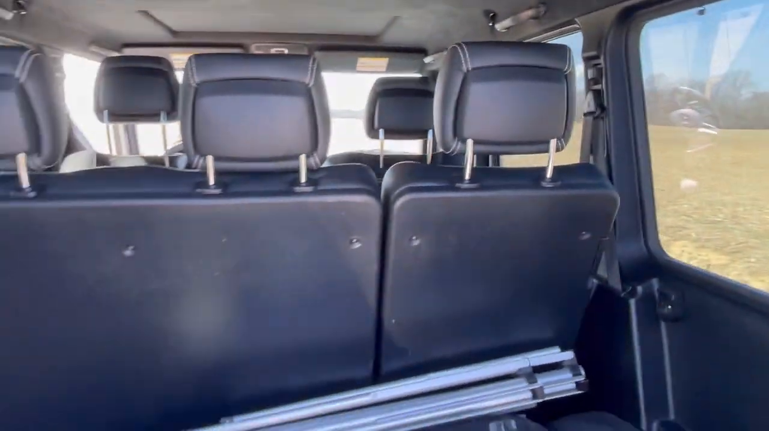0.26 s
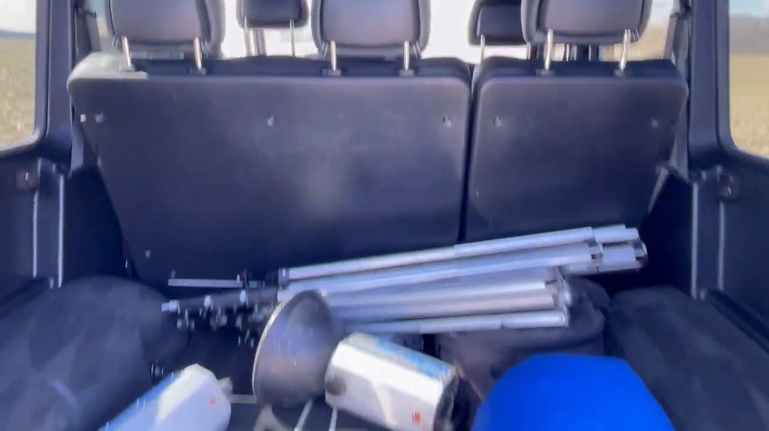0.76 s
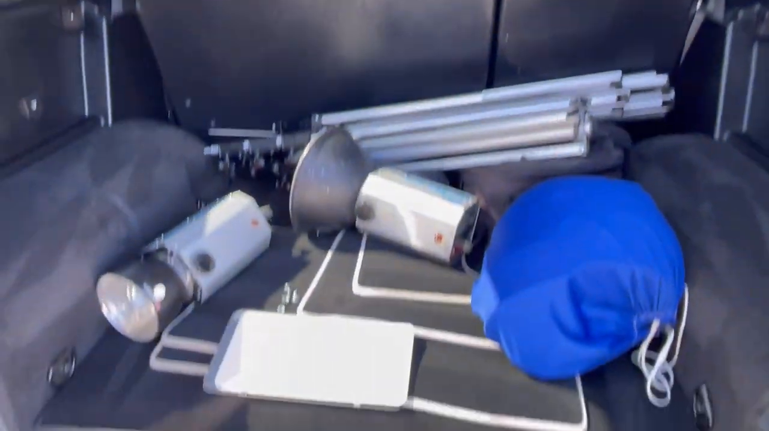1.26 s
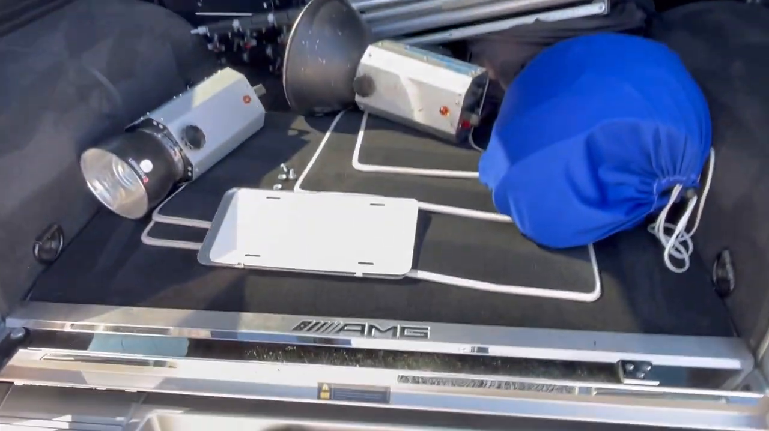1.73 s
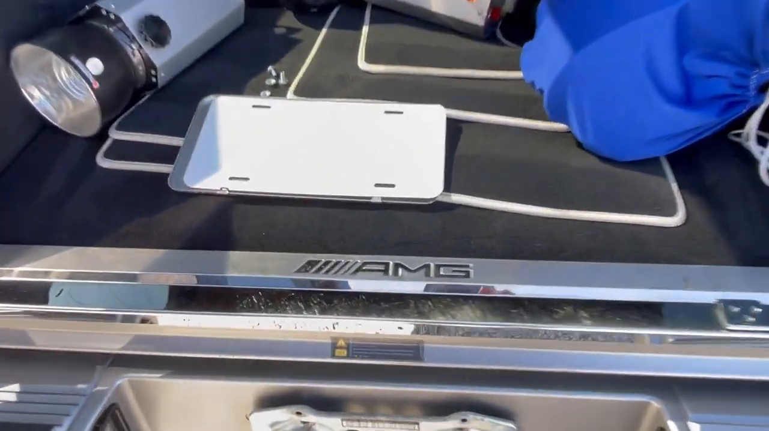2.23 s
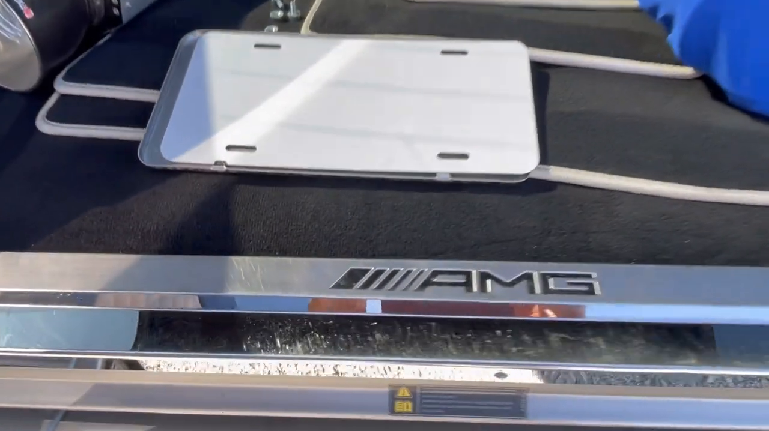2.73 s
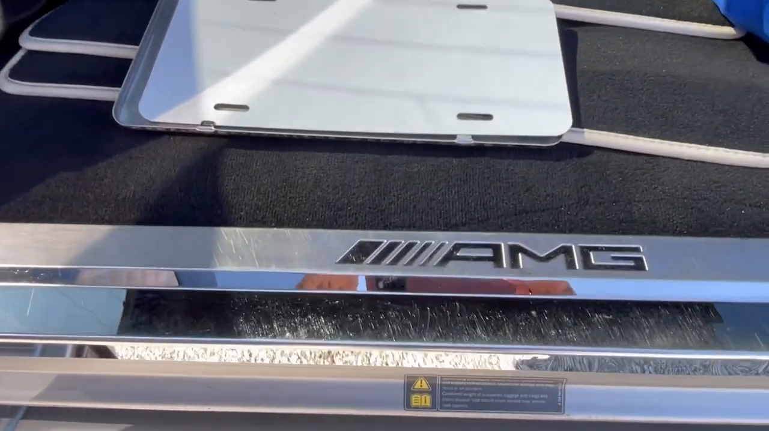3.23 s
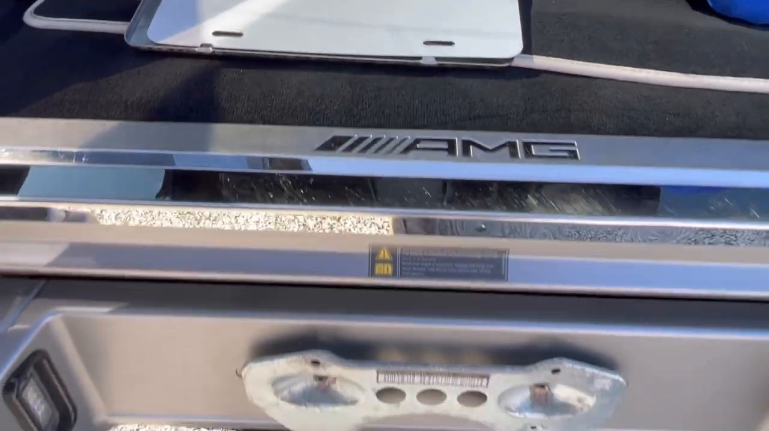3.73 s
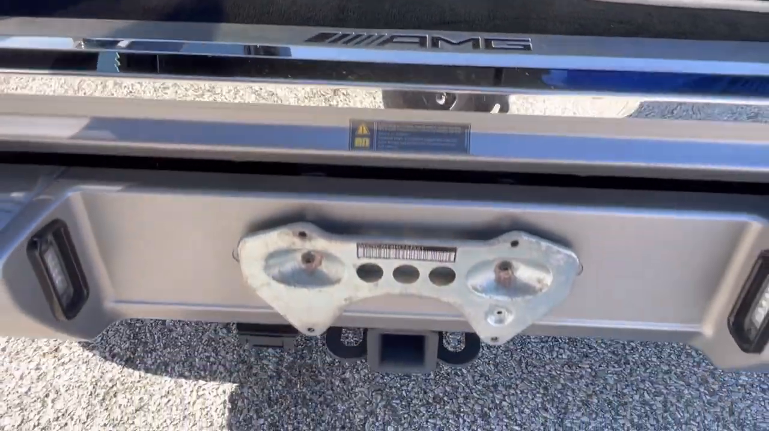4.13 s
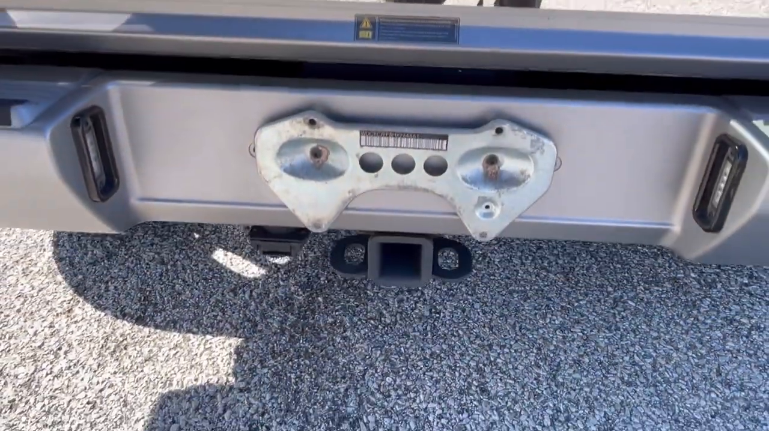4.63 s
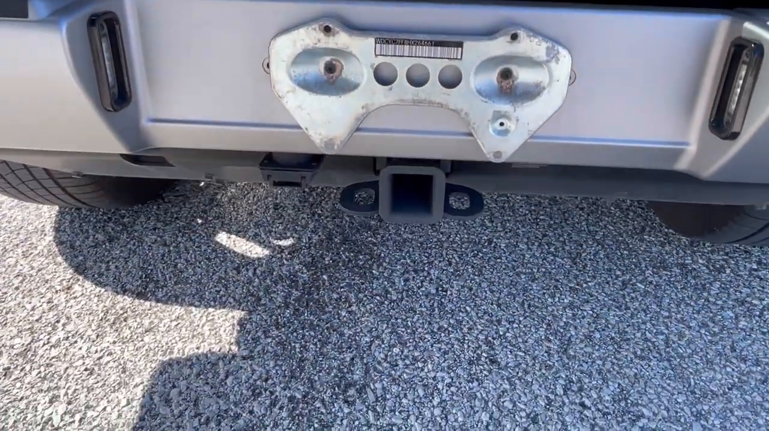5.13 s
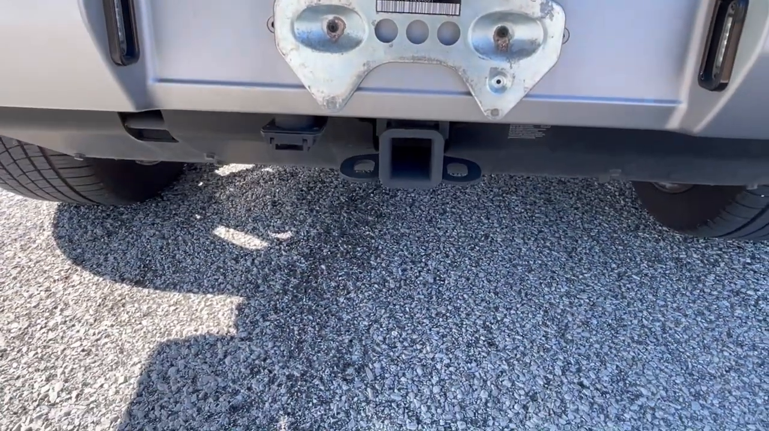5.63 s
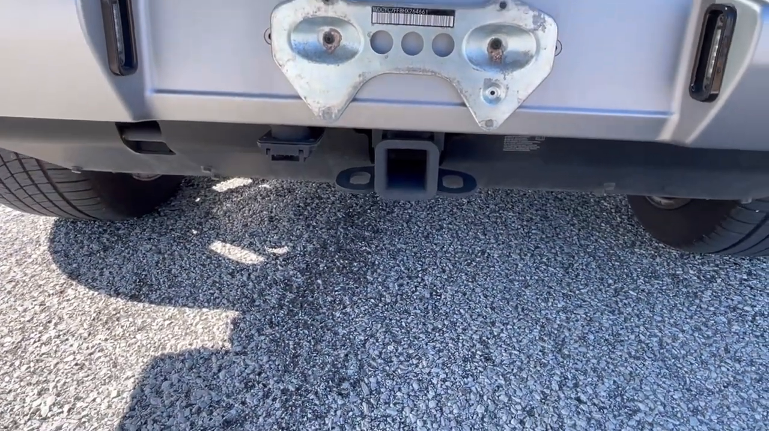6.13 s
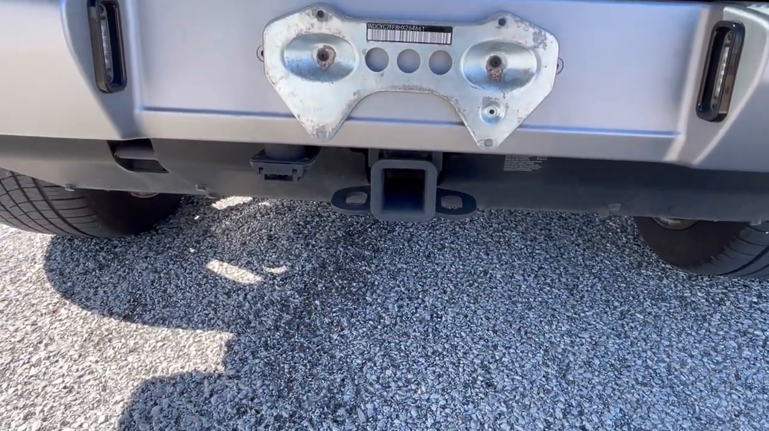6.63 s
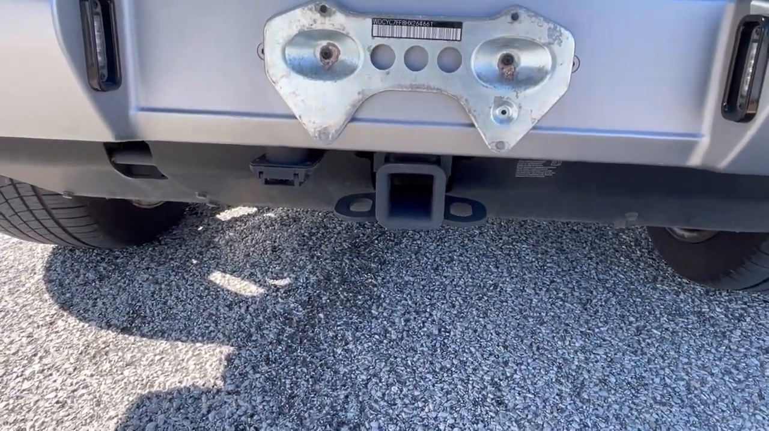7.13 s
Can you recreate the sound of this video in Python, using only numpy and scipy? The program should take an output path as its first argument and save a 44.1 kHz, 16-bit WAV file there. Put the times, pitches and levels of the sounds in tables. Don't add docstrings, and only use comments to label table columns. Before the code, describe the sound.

A big petrol engine idles with a deep uneven throb, moving from boxy to close and rattly, as shoes scuff and stones crack on gravel.

```python
import sys
import numpy as np
from scipy import signal
from scipy.fft import rfft, irfft, next_fast_len
from scipy.io import wavfile
from scipy.ndimage import map_coordinates

SR = 44100
rng = np.random.default_rng(int(sys.argv[2]) if len(sys.argv) > 2 else 0)


def to_wav(sig):
    pcm = np.clip(np.atleast_2d(sig), -1, 1) * 32767
    pcm = np.round(pcm).astype(np.int16)
    wavfile.write(sys.argv[1], SR, pcm.T)


def gain_from_db(level_db):
    decades = np.asarray(level_db, float) / 20
    return 10 ** decades


N = 325017
TIME = np.arange(N) / SR

# time_s, nearness_db, view_under_car_0_to_1
PHONE_PATH = [(.1, -5.5, 0.2), (.35, -4, 0.4), (.7, -1.5, .15), (1.2, -0.2, .3), (1.7, -0.06, 0.42),
              (2.7, -0.33, 0.28), (3.4, 0.4, .37), (4.2, 3, 0.3), (4.8, 4.5, .5), (5.3, 6.5, 0.72),
              (5.7, 7, 0.71), (6.5, 6.5, 0.6), (7.3, 8, .68)]
# time_s, speed_rpm
CRANK_SPEED = [(0.0, 673.4), (1.2, 671.2), (1.6, 670.0), (2.0, 668.0), (2.4, 667.5), (3.2, 671.0),
               (3.6, 671.2), (4.0, 670.5), (4.4, 670.7), (4.8, 672.6), (5.2, 672.2), (5.6, 668.9),
               (6.0, 667.0), (6.4, 667.7), (6.8, 671.1), (7.2, 677.1)]
# charge_db, bark_db
CYLINDERS = [(-1, 2.5), (1.7, 1.5), (5.5, 2), (8, -1), (4, -0.5), (8.5, 3), (2.5, -12), (5.7, 2),
             (6.5, -7.5), (2.5, -6), (7.5, 1), (3.5, -3.5)]
# time_s, level_db
STUMBLES = [(.02, -2), (.71, -8.5), (.9, -6), (1.61, -6), (2.681, -5), (2.88, -3.5), (3.579, -8),
            (4.12, -1.5), (4.3, -2), (5.55, -3), (5.911, -7), (6.9, -5), (7.05, -4), (7.28, -3.5)]
# place_firing_steps, level_db
VALVE_CLOSINGS = [(.3, -4.5), (.9, 3), (1.7, -4.5), (2.25, -13.5), (2.9, 4.5), (3.4, -12), (4, -12),
                  (4.4, -11.5), (5, -14), (5.3, -8.5), (6.05, -4), (7, -5.5), (7.3, -8), (8.6, 0), (9.4, 9),
                  (9.9, -4), (10.2, 2), (10.85, -2)]
# time_s, pitch_hz
FAN_RATE = [(0, 71.5), (3, 71.5), (3.5, 71.26), (5.6, 71.26), (6, 71.5), (7.37, 71.4)]
# frequency_hz, density_db_per_hz
BARK_IN_BAY = [(88, -22.5), (150, 0.5), (156, -3.5), (236, -10), (270, -21), (317, -14.5), (423, -28),
               (639, -33.5), (756, -30), (800, -24), (1040, -54), (1760, -120)]
# frequency_hz, density_db_per_hz
BARK_BELOW = [(88, -3.5), (150, -4), (162, -6), (247, -10), (345, -33.5), (383, -20.5), (460, -17),
              (605, -28.5), (772, -40), (800, -23), (1040, -61), (1760, -120)]
# frequency_hz, density_db_per_hz
RUMBLE_COLOUR = [(18, -30.5), (30, -10.5), (50, 5.5), (60, 3), (85, 9), (110, 11), (160, -11), (250, -17.5),
                 (500, -110)]
# frequency_hz, density_db_per_hz
CLATTER_IN_BAY = [(350, -6.5), (600, -5.5), (642, -2.5), (757, -10), (822, -5), (969, 2), (1040, -1.5),
                  (1190, 1.5), (1390, -1.5), (1590, -7.5), (1980, -9), (2110, -6), (2210, -29),
                  (3600, -26.5), (4680, -57.5), (7920, -120)]
# frequency_hz, density_db_per_hz
CLATTER_BELOW = [(350, -22), (600, -4), (729, -10), (774, -24.5), (822, -9.5), (1100, -9.5), (1390, -1.5),
                 (1630, -2.5), (1770, -7.5), (1930, -6.5), (2100, -16), (2210, -15.5), (2610, -27.5),
                 (3600, -27.5), (4680, -61), (7920, -120)]
# frequency_hz, density_db_per_hz
HISS_COLOUR = [(900, -110), (2000, 2), (2700, 1.5), (3600, -4), (5100, -4.5), (5900, -3.5), (7200, -11),
               (7900, -7.5), (8400, -8.5), (9300, -5.5), (10300, -12), (10900, -12.5), (11100, -44.5),
               (12200, -48.5)]
# frequency_hz, density_db_per_hz
GRIT_COLOUR = [(700, -110), (1500, -10), (3000, -2), (3800, -5), (4500, -3), (5200, -4.5), (6000, -6),
               (7000, -9), (8500, -6.5), (9600, -13.5), (10400, -9), (11200, -13.5), (11650, -22),
               (12000, -94.5)]
# pitch_hz, width_hz, level_db
TAIL_PIPE = [(185, 20, -6), (241, 20, 4), (517, 28, 2)]
# pitch_hz, width_hz, level_db
BAY_AIR = [(321, 24, 6)]
# pitch_hz, width_hz, level_db
PANELS = [(845, 22, 0), (1000, 30, -3), (1164, 20, 1), (1228, 30, -2), (1276, 16, 1), (1360, 12, 3),
          (1422, 30, -1), (1734, 20, 1), (2052, 16, 2), (2563, 30, -2)]
# pitch_hz, width_hz, level_db
BAY_TRIM = [(1912, 12, 9)]
# pitch_hz, width_hz, level_db
FLOOR_COVER = [(1360, 13, 9), (1428, 30, 1), (1290, 30, 1)]
# centre_s, length_s, level_db, left_over_right_db
SCUFFS = [(0.687, 0.093, -62, 1), (1.093, 0.12, -54, -3.5), (1.237, 0.056, -60.5, 0), (3.6, .2, -63, -2),
          (4.315, 0.028, -53, -2), (4.488, 0.039, -52.5, -2), (5.182, 0.018, -54, 1),
          (6.724, 0.079, -48.5, -3), (6.822, 0.13, -46.5, -3), (7.017, 0.12, -49, -3),
          (7.085, 0.04, -51, 0), (7.128, 0.046, -57, 0), (7.268, .07, -68, 0)]
# start_s, peak_db, pitch_hz
STONE_CRACKS = [(.46, -57, 6700), (2.985, -52, 2200), (3.192, -51, 2190), (4.243, -51.5, 2220),
                (4.267, -40, 2280), (4.268, -34.5, 1230), (4.27, -35, 740), (4.285, -49, 1610),
                (4.294, -50, 2200), (4.3, -44.5, 1100), (4.312, -32.5, 706), (4.481, -44.5, 6700),
                (4.484, -44, 4370), (4.497, -45, 6200), (5.85, -33.5, 1600), (5.85, -39, 2470),
                (5.8496, -34, 3140), (5.851, -38, 4540), (5.953, -41.5, 1700), (5.953, -48, 4600),
                (6.417, -35.5, 2350), (6.419, -45.5, 4600), (7.296, -41, 2480)]
# start_s, peak_db, pitch_hz
HEEL_THUDS = [
    (4.329, -16, 241),
    (4.33, -33, 432),
    (4.354, -29, 315),
    (4.433, -33, 223),
]
# frequency_hz, likeness_0_to_1
PORT_LIKENESS = [(60, .98), (150, .6), (300, .75), (600, .72), (1000, .66), (2000, .5), (3400, .3),
                 (5200, .33), (6000, .62), (7000, .4), (8000, .72), (9000, .92), (10300, .97), (11500, .85)]
# frequency_hz, left_over_right_db
PORT_SHADING = [(60, 0.59), (140, 5), (260, 1.5), (500, 4.5), (1000, 2.1), (2000, -1.5), (4000, 1),
                (11400, 1)]
# frequency_hz, left_leads_by_rad
PORT_LEAD = [(0, 0), (600, .05), (1000, -.5), (1500, -.5), (2070, .6), (2580, .5), (3300, 2.9), (4300, .2),
             (5200, 3.1), (5900, 5.9), (7060, 9.2), (8000, 7.1), (9000, 5.5), (9500, 4.4), (10200, 3.14),
             (10900, 2.4), (11600, 0)]


def unit(x):
    return x / np.sqrt(np.mean(x ** 2) + 1e-20)


def along(points, hz):
    f, v = np.transpose(points)
    return np.interp(np.log(hz + 1), np.log(f + 1), v)


def curves(rows):
    s, *cols = np.transpose(rows)
    return [np.interp(TIME, s, c) for c in cols]


def wobble(rate):
    knots = rng.standard_normal(int(N * rate / SR) + 4)
    return map_coordinates(knots, [TIME * rate])


def filtered(x, response):
    m = next_fast_len(N + SR // 2)
    spectrum = rfft(x, m) * response(np.fft.rfftfreq(m, 1 / SR))
    return irfft(spectrum, m)[..., :x.shape[-1]]


def coloured(x, colour):
    return filtered(x, lambda f: gain_from_db(along(colour, f)))


def mode(f, hz, width):
    return 1j * f * width / (hz * hz - f * f + 1j * f * width)


def resonant(x, modes, colour):
    def response(f):
        rings = 1 + sum(gain_from_db(db) * mode(f, hz, width) for hz, width, db in modes)
        return rings * gain_from_db(along(colour, f))
    return filtered(x, response)


def spread(mid, other):
    def response(f):
        turn = np.arccos(np.clip(along(PORT_LIKENESS, f), 0, 1)) / 2
        return np.array([np.cos(turn), np.sin(turn)])
    a, b = filtered(np.array([mid, other]), response)
    return np.array([a + b, a - b])


def level(far_db, growth):
    return far_db + growth * curves(PHONE_PATH)[0]


def bay_to_below(bay, below):
    view = np.clip(curves(PHONE_PATH)[1], 0, 1)
    return (1 - view) * bay + view * below


def sheltered():
    out_s = 0.86
    return np.clip(1 - TIME / out_s, 0, 1)


def firing():
    return np.cumsum(curves(CRANK_SPEED)[0] / 10) / SR


def firing_steps():
    return np.arange(int(firing()[-1]))


def blows(steps, sizes):
    at = np.searchsorted(firing(), steps)
    return np.bincount(np.clip(at, 0, N), sizes, N + 1)[:N]


def valve_rattle():
    place, db = np.transpose(VALVE_CLOSINGS)
    count = len(CYLINDERS)
    cycle = count * np.arange(int(firing()[-1]) // count + 1)[:, None]
    luck = rng.standard_normal((len(cycle), len(place), 2))
    steps = cycle + place + 0.079 * luck[..., 0]
    sizes = gain_from_db(db + 1.9 * luck[..., 1])
    ticks = blows(steps.ravel(), sizes.ravel())
    return signal.fftconvolve(ticks, np.hanning(240))[120:][:N]


def air_hiss(rattle):
    hiss_db = level(-62, growth=1.18) - 2.5 * sheltered()
    air = (9 + unit(rattle)) * gain_from_db(0.7 * wobble(5)) * rng.standard_normal((2, N))
    return gain_from_db(hiss_db + 2.5) * spread(*unit(coloured(air, HISS_COLOUR)))


def shoe_scuffs():
    half = np.array([[0.5], [-0.5]])
    drag = 0
    for s, length, db, lean in SCUFFS:
        drag = drag + gain_from_db(db + half * lean) * np.exp(-(2 * (TIME - s) / length) ** 4)
    grains = rng.standard_normal((2, N)) * gain_from_db(1.5 * wobble(300))
    return drag * spread(*unit(coloured(grains, GRIT_COLOUR)))


def stones_and_heel():
    hits, t = np.zeros(N + SR), TIME[:3000]
    for s, db, hz in STONE_CRACKS:
        t60 = 0.028 * (2000 / hz) ** 0.31
        snap = np.sin(2 * np.pi * hz * t)
        snap = snap + 0.49 * rng.standard_normal(len(t)) * gain_from_db(-60 * t / 0.0042)
        onset = 1 - np.exp(-t / 0.00036)
        hits[round(s * SR):][:len(t)] += gain_from_db(db - 60 * t / t60) * onset * snap
    for s, db, hz in HEEL_THUDS:
        u = hz * t
        hits[round(s * SR):][:len(t)] -= gain_from_db(db + 7.0) * np.sin(2 * np.pi * u) * u * np.exp(-(1.2 * u) ** 2)
    return spread(hits[:N], np.roll(hits[:N], 9))


def electric_fan():
    turn = 2 * np.pi * np.cumsum(curves(FAN_RATE)[0]) / SR
    whine = gain_from_db(-63 - 1.6 * TIME + 2.5 * wobble(8)) * np.cos(7 * turn + 0.5 * wobble(10))
    whine = whine + gain_from_db(-58 + 2 * wobble(3)) * np.cos(4 * turn + 0.4 * wobble(6))
    hum = gain_from_db(-36.5 + 0.99 * wobble(2.7)) * np.cos(turn + 1.6)
    return hum + whine


def valve_clatter(rattle):
    clatter_db = level(-49, growth=0.93)
    drive = (6.8 + unit(rattle)) * gain_from_db(0.65 * wobble(12)) * rng.standard_normal((2, N))
    bay = unit(resonant(drive, PANELS + BAY_TRIM, CLATTER_IN_BAY))
    below = unit(resonant(drive, PANELS + FLOOR_COVER, CLATTER_BELOW))
    return gain_from_db(clatter_db + 2.0) * spread(*bay_to_below(bay, below))


def overtone_level():
    return level(-37, growth=0.78) - 17 * sheltered()


def exhaust_rumble():
    rumble = coloured(rng.standard_normal((2, N)), RUMBLE_COLOUR)
    return gain_from_db(overtone_level() - 3.5) * spread(*unit(rumble))


def exhaust_bark():
    step = firing_steps()
    edge_db = np.transpose(CYLINDERS)[1, step % len(CYLINDERS)]
    kicks = blows(step - 0.1, gain_from_db(edge_db + 0.88 * rng.standard_normal(len(step))))
    gate = signal.fftconvolve(kicks, np.hanning(420))[:N]
    rough = (1.7 + unit(gate)) * rng.standard_normal((2, N))
    rasp = unit(rough) + 0.28 * unit(np.roll(kicks, 200))
    bay = unit(resonant(rasp, TAIL_PIPE + BAY_AIR, BARK_IN_BAY))
    below = unit(resonant(rasp, TAIL_PIPE, BARK_BELOW))
    bark = bay_to_below(bay, below)
    return gain_from_db(level(-43, growth=0.79) + 2.23) * spread(*unit(bark))


def silencer_throb():
    throb_db = level(-22.5, growth=0.7) + 6.5 * np.exp(-TIME / 1.05)
    step = firing_steps()
    charge_db = np.transpose(CYLINDERS)[0, step % len(CYLINDERS)]
    luck = rng.standard_normal((len(step), 2))
    stumble_db = sum(db * np.exp(-((TIME - s) / 0.018) ** 2) for s, db in STUMBLES)
    puffs = blows(step + 0.19 + 0.013 * luck[:, 0], gain_from_db(charge_db + 1.1 * luck[:, 1]))
    puffs = gain_from_db(stumble_db) * puffs
    before = np.searchsorted(firing(), len(CYLINDERS))
    running = np.r_[puffs[:before], puffs]
    throb = filtered(running, lambda f: mode(f, 61.44, 21.6) ** 2)[before:]
    return gain_from_db(throb_db) * unit(throb)


def exhaust_tones():
    turn = 2 * np.pi * firing()
    octave_db = overtone_level() + 2.5 + 0.81 * wobble(14)
    octave = gain_from_db(octave_db) * np.cos(2 * turn + 1.39 - 0.32 * TIME + 0.31 * wobble(14))
    banks_db = -40 - 0.4 * TIME + 1.5 * wobble(6)
    banks = gain_from_db(banks_db) * np.cos(1.5 * turn - 2.1 - 0.4 * TIME)
    tones = silencer_throb() + octave + banks
    lag = np.roll(tones, 150) * (1 + 0.6 * wobble(2.966))
    return np.array([tones + 0.049 * lag, tones - 0.17 * lag])


def scene():
    rattle = valve_rattle()
    car = air_hiss(rattle) + electric_fan() + valve_clatter(rattle)
    car = car + exhaust_rumble() + exhaust_bark() + exhaust_tones()
    deep = np.clip(0.75 - 0.91 * TIME, 0, 1)
    seat_backs = filtered(car, lambda f: mode(f, 740, 1000) ** 2)
    return car - deep * seat_backs + shoe_scuffs() + stones_and_heel()


def roll_off(x):
    return signal.sosfilt(signal.butter(12, 12050, fs=SR, output="sos"), x)


def record(dry):
    half, run_on = np.array([[0.5], [-0.5]]), SR // 20
    longer = np.pad(dry, ((0, 0), (run_on, run_on)), mode="reflect", reflect_type="odd")

    def housing(f):
        return gain_from_db(half * along(PORT_SHADING, f)) * np.exp(1j * half * along(PORT_LEAD, f))
    ports = filtered(longer, housing)[:, run_on:-run_on]
    return roll_off(ports)


dry = scene()
out = record(dry)
to_wav(out)
```